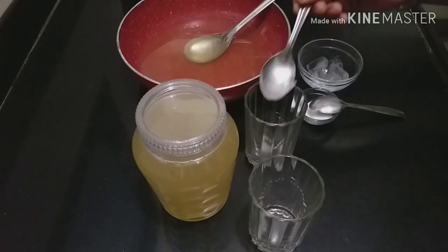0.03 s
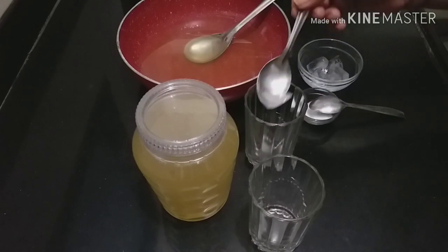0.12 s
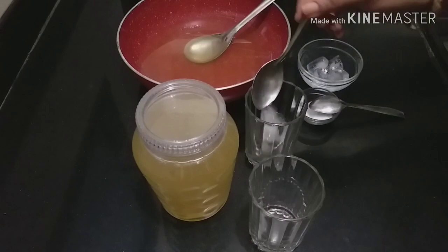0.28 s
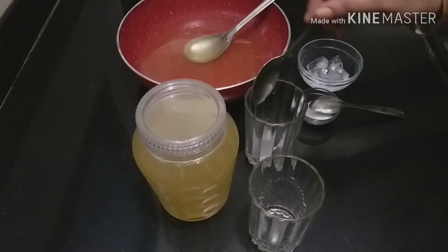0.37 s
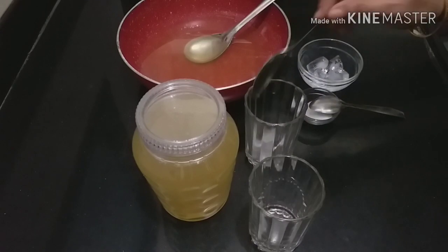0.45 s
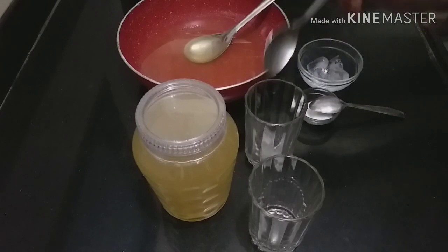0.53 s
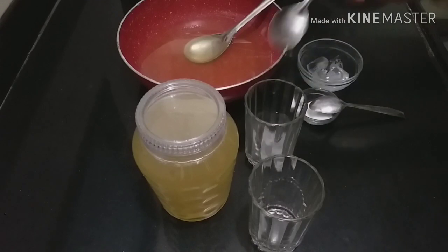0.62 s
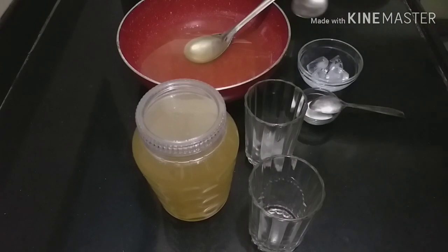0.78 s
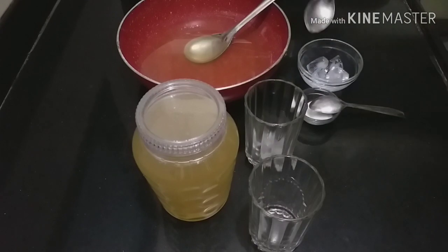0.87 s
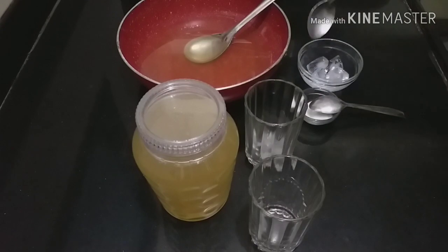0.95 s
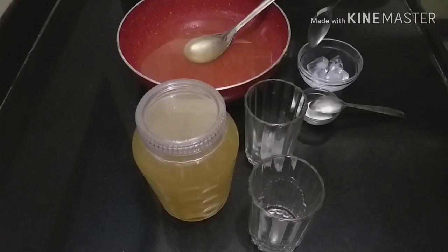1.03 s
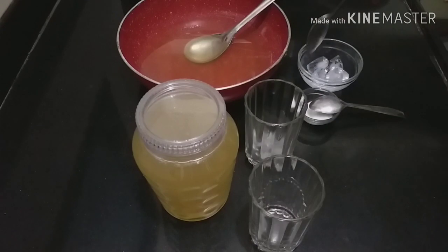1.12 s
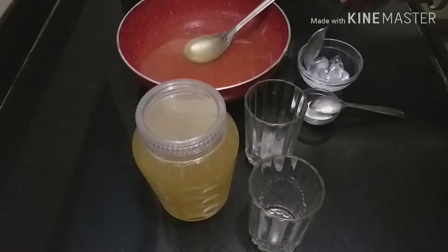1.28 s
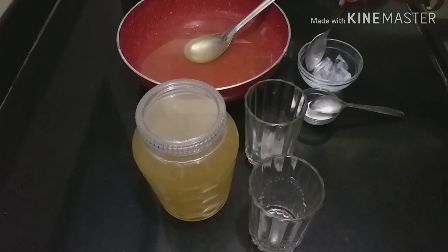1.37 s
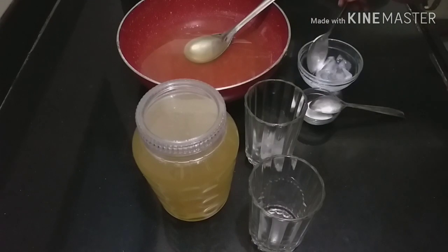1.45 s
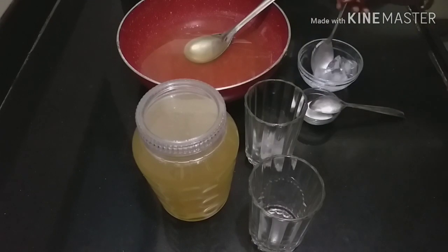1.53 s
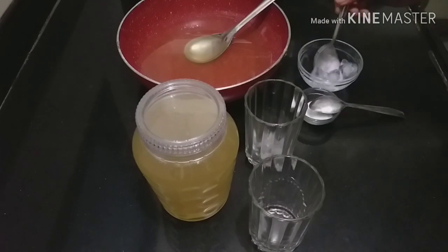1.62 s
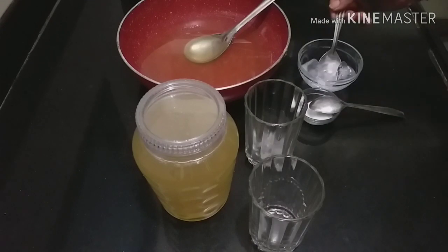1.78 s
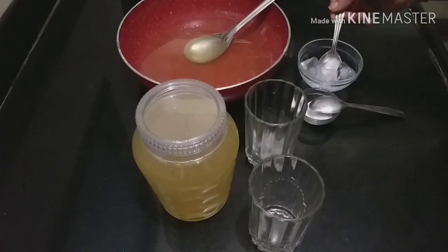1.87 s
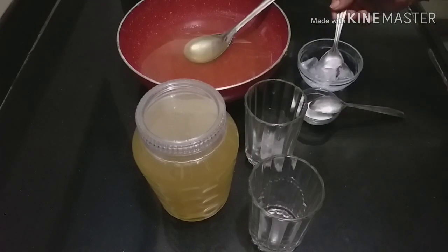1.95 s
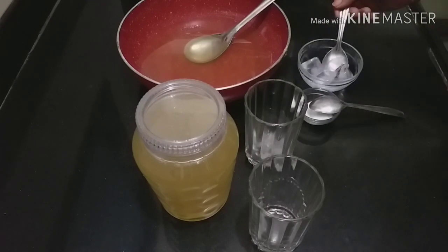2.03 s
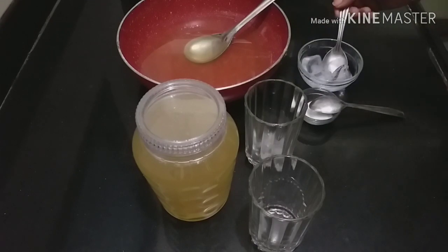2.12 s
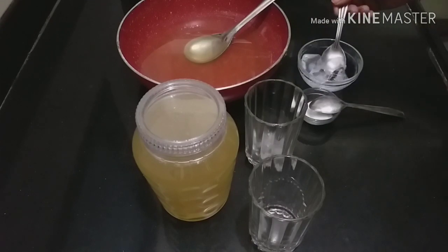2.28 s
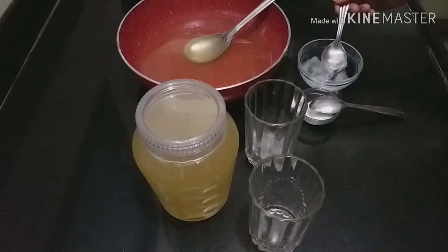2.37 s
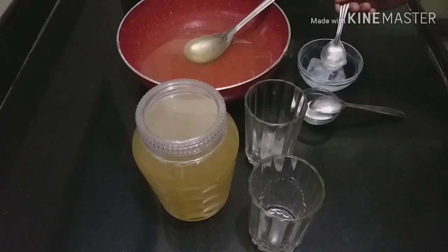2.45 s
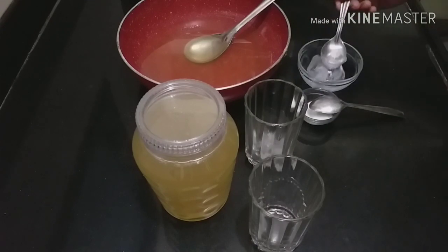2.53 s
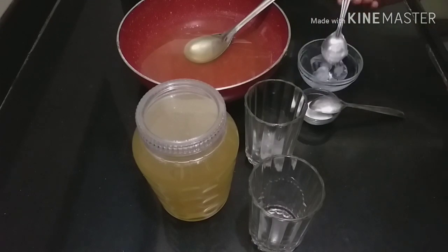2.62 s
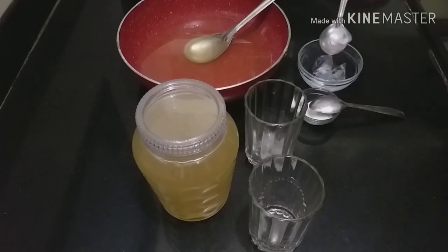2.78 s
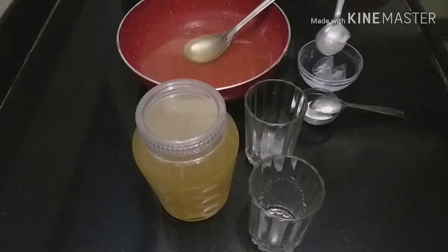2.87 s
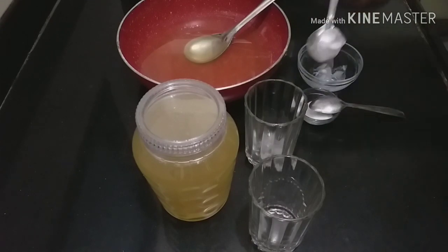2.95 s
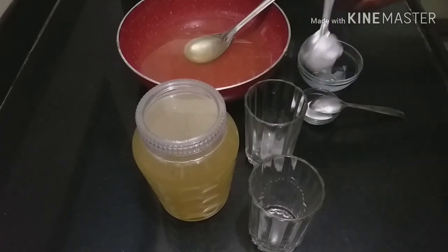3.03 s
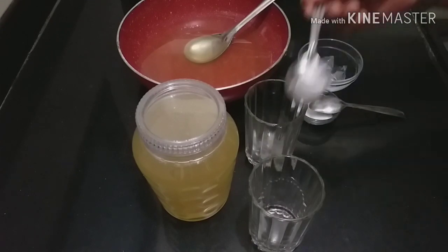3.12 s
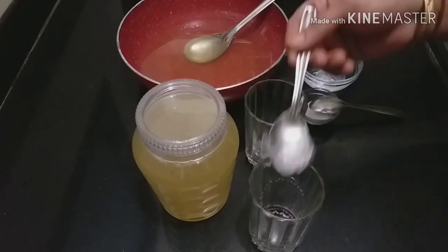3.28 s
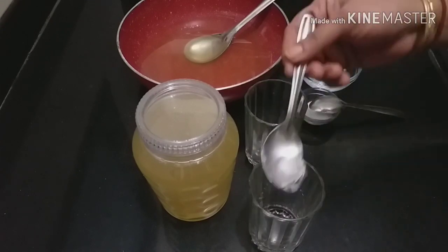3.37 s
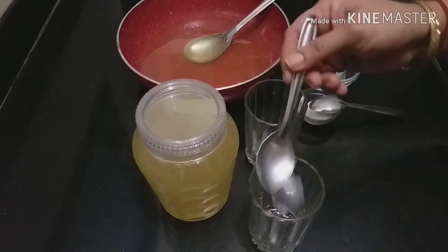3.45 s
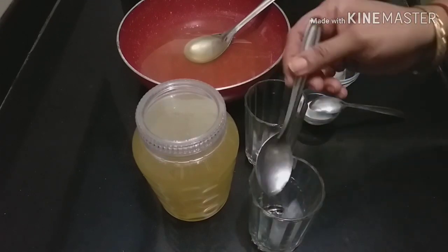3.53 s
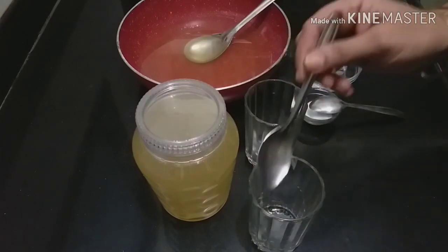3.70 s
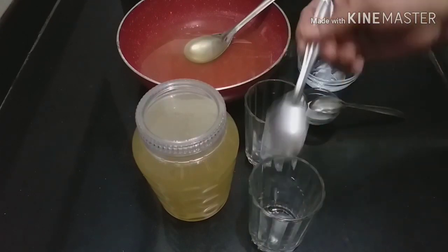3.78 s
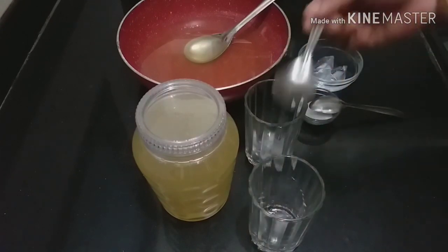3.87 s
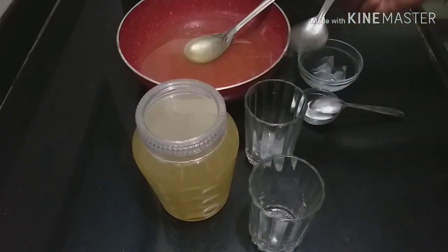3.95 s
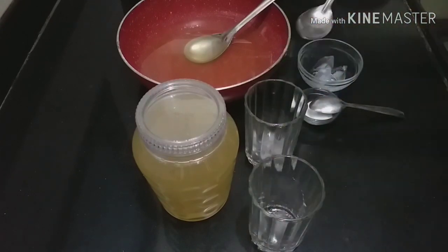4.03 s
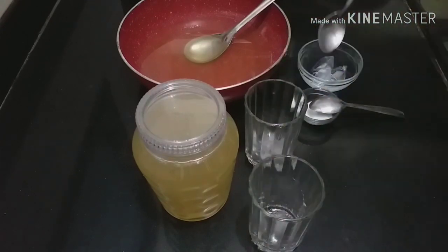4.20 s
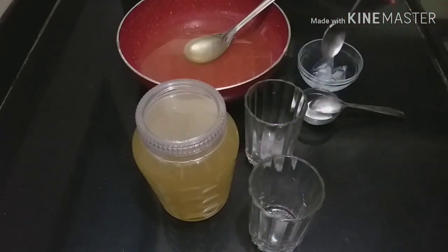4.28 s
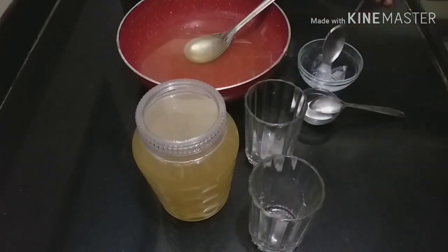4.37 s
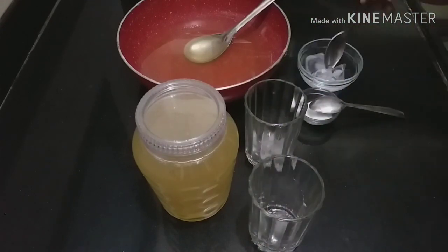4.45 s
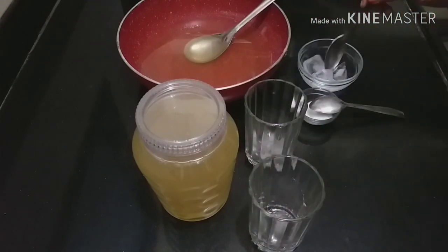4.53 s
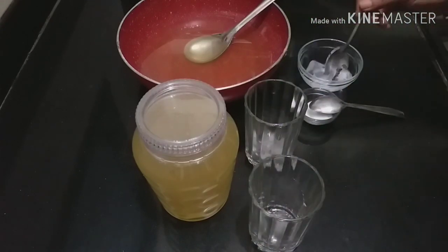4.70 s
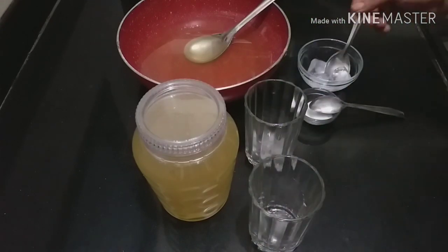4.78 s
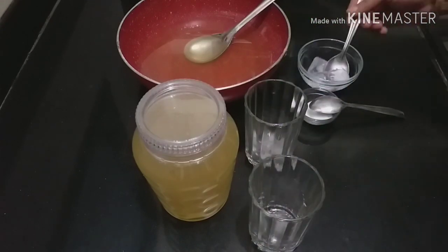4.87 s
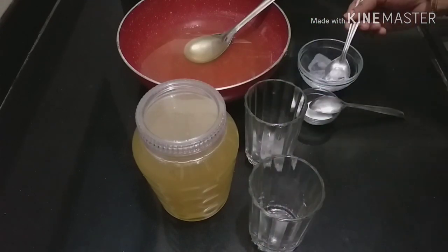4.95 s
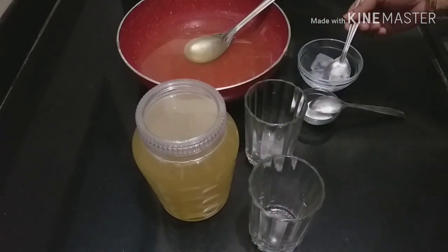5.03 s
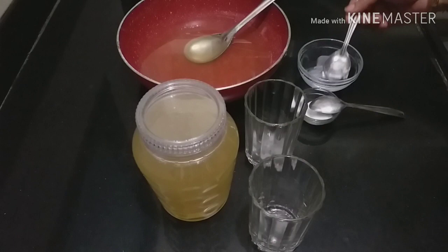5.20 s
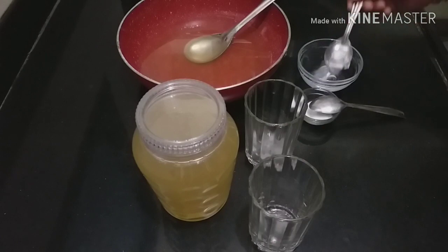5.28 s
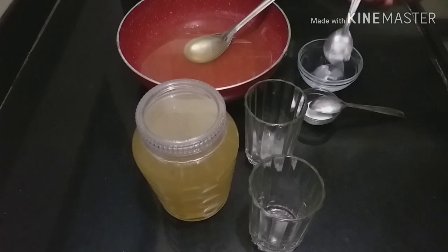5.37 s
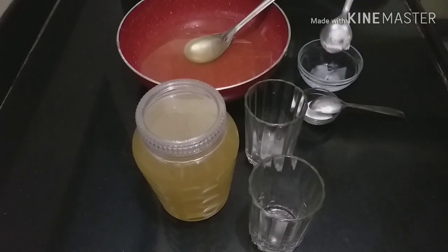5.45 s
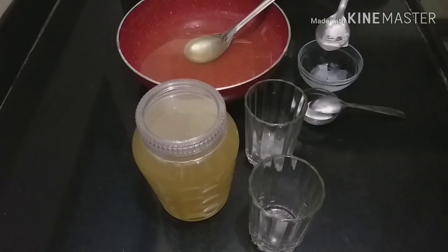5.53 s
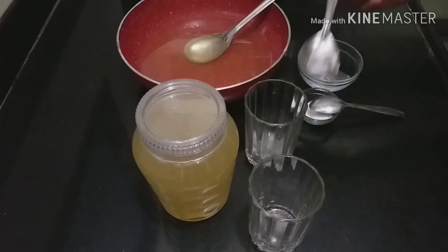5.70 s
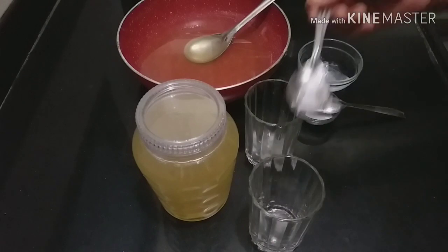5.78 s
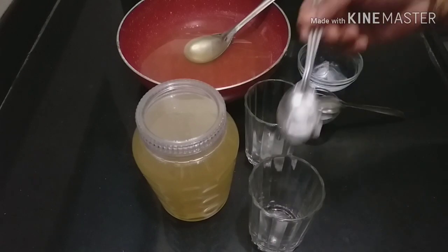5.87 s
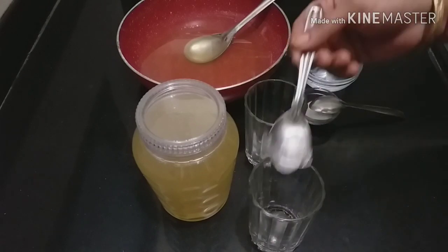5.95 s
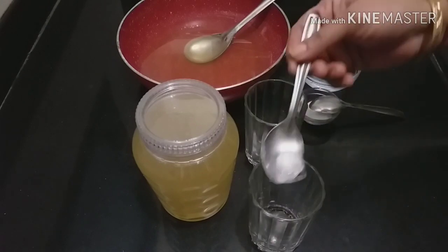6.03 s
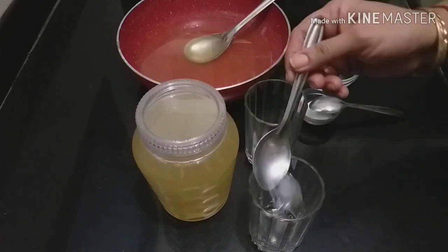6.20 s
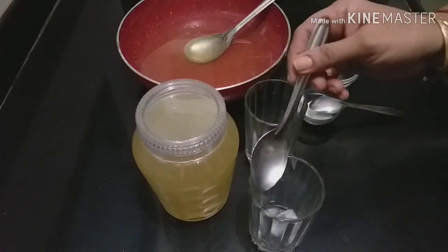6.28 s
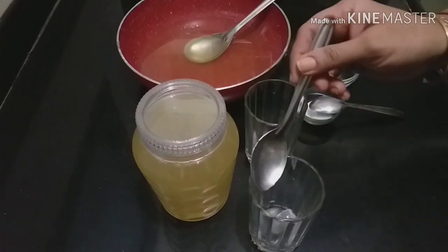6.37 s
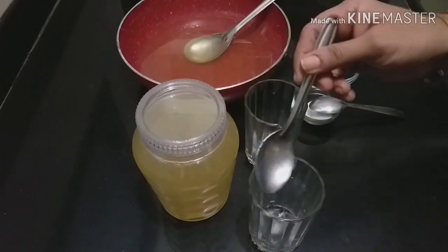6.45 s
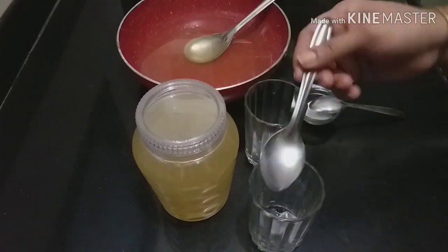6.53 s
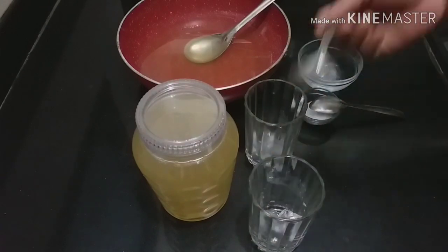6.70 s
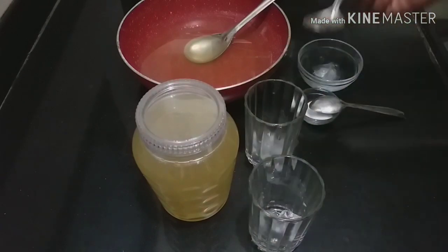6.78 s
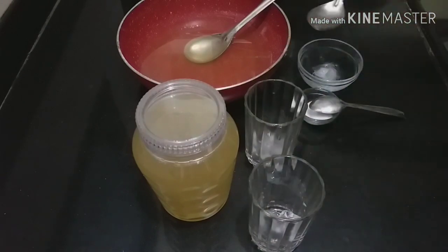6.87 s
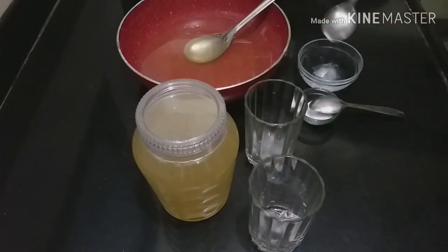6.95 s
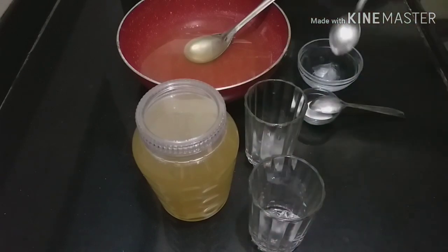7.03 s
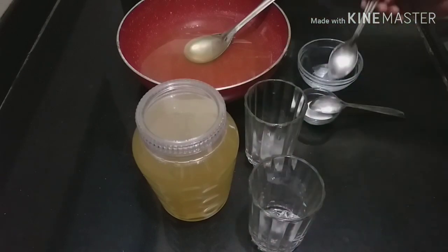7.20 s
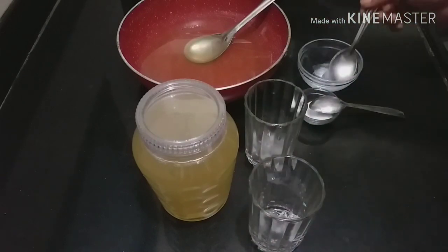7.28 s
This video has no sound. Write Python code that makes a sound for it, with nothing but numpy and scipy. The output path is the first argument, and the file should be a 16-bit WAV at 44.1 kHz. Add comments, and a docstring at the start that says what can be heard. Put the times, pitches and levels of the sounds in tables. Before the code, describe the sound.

Ice cubes drop and rattle into thick glass tumblers in three bursts, with a steel spoon clinking and scraping in a glass bowl between.

```python
"""In a small, hard-walled kitchen, a steel spoon scoops ice cubes from a small glass bowl into thick tumblers.
Three times a spoonful drops, bounces and rattles to rest; between the drops ice slides round the bowl.
Each contact is a pitched crack, a hollow knock and a bright snap; many also ring as fading sine tones.
Sliding and rattling are crowds of tiny random slips, and grinding is short bursts of rough noise.
The room answers every contact with fading noise echoes, over soft air noise and a faint appliance hum."""
import sys
import numpy as np
from scipy import signal
from scipy.io import wavfile

SR = 44100
rng = np.random.default_rng(int(sys.argv[2]) if len(sys.argv) > 2 else 0)


def generate_wav(signal):
    """Clip the signal to [-1, 1] and save it as 16-bit WAV at the path in sys.argv[1]."""
    frames = np.transpose(np.atleast_2d(signal))
    scaled = np.clip(frames, -1, 1) * 32767
    pcm = np.round(scaled).astype(np.int16)
    wavfile.write(sys.argv[1], SR, pcm)


N = 322812
TIME = np.arange(N) / SR
CUTOFF_HZ = 16500


def from_db(db):
    """Turn decibels into a plain multiplier."""
    return 10 ** (np.asarray(db) / 20)


def rms_one(x):
    """Scale a sound to an average (rms) strength of 1."""
    return x / np.sqrt(np.mean(x ** 2) + 1e-20)


def attack_one(x):
    """Scale a sound to rms 1 over its first 5 ms."""
    return x / np.sqrt(np.mean(x[:SR // 200] ** 2))


def fade(t, t60):
    """Die away steadily, by 60 dB in t60 seconds."""
    return np.exp(-np.log(1000) * t / t60)


def at_hz(points, hz, axis=1):
    """Read one column of a table between its rows, on a log-frequency axis."""
    points = np.array(points)
    return np.interp(np.log(hz), np.log(points[:, 0]), points[:, axis])


def butter(x, hz, kind, order=2):
    """Filter a sound: keep what is below, above or between the given pitches."""
    sos = signal.butter(order, np.clip(hz, 10, .45 * SR), kind, fs=SR, output="sos")
    return signal.sosfilt(sos, x)


def resonate(x, hz, width):
    """Ring at one pitch, as a resonance of gain 1 at its top; width is in Hz."""
    r = np.exp(-np.pi * width / SR)
    feed = np.array([1, 0, -1]) * (1 - r * r) / 2
    feedback = [1, -2 * r * np.cos(2 * np.pi * hz / SR), r * r]
    return signal.lfilter(feed, feedback, x + 1e-18)


def hollow_ring(x, hollow):
    """Pass a push through a vessel's hollow resonances, with alternating signs."""
    return sum((-1) ** k * from_db(db) * resonate(x, hz, width) for k, (hz, width, db) in enumerate(hollow))


def add(out, start_s, sound):
    """Mix a sound in at a given time."""
    i = round(start_s * SR)
    out[i:i + len(sound)] += sound[:max(N - i, 0)]


def noise_bands(size):
    """Give half-octave bands of noise with their centres; neighbours are unrelated."""
    white = rng.standard_normal((2, size))
    edges = 22 * 2 ** np.arange(0, 10, .5)
    for k, (low, high) in enumerate(zip(edges, edges[1:])):
        yield np.sqrt(low * high), butter(white[k % 2], [low, high], "band")


# Crack of an ordinary contact: knock and snap are reckoned from there
ORDINARY_DB, ORDINARY_HZ = -35, 3700
# The higher its crack, the more glancing a contact and the less it knocks on the vessel
KNOCK_LOSS_DB_PER_OCTAVE = 5.5


def blows(rows, knock_db, knock_growth, snap_db, snap_growth):
    """Give each contact a knock and snap that grow with its force, in dB per dB of crack."""
    out = []
    for start_s, crack_db, crack_hz, *_ in rows:
        force_db = crack_db - ORDINARY_DB
        glance_db = KNOCK_LOSS_DB_PER_OCTAVE * np.log2(crack_hz / ORDINARY_HZ)
        knock = knock_db + knock_growth * force_db - glance_db
        out.append((start_s, crack_db, crack_hz, knock, snap_db + snap_growth * force_db))
    return out


def contacts(rows, hollow, damping, chatter, chatter_t60, knock_chatter, snap_hz):
    """Turn a sharp push and a few ms of chatter into a pitched crack, a hollow knock and a bright snap."""
    out, t = np.zeros(N), TIME[:SR // 10]
    push = 1.0 * (t == 0)
    for start_s, crack_db, hz, knock_db, snap_db in rows:
        grit = rng.standard_normal((3, len(t))) * fade(t, chatter_t60)

        crack = resonate(push + chatter * grit[0], hz, damping * hz)
        crack = butter(butter(crack, 1600, "high"), 9000, "low", order=7)
        # Bending waves spread out in time, so the crack swells over a few cycles
        crack = crack - 2 * resonate(crack, hz, .5 * hz)

        knock = butter(hollow_ring(push + knock_chatter * grit[1], hollow), 2100, "low")

        snap = butter(push + 0.073 * grit[2], snap_hz, "high", order=4)
        snap = butter(snap, 20000, "low", order=1)
        for band_hz in np.geomspace(snap_hz, CUTOFF_HZ, 4):  # the snap is smeared likewise
            snap = snap - 2 * resonate(snap, band_hz, band_hz / 10)

        for level_db, part in [(crack_db, crack), (knock_db, knock), (snap_db, snap)]:
            add(out, start_s, from_db(level_db) * attack_one(part))
    return out


# A hard, glancing touch of steel favours the high tones: the ring's spectrum tilts about this pitch
RING_PIVOT_HZ = 4000


def struck_rings(rows, tones, split, twin_db, twin_life, rise_s):
    """Ring each tone by force and place; uneven walls and leaning ice split glass modes, so they waver."""
    out, t = np.zeros(N), TIME[:SR * 2 // 3]
    for start_s, _, _, ring_db, tilt_db, place_db in rows:
        for hz, tone_db, t60, sway in tones:
            db = ring_db + tone_db + tilt_db * np.log2(hz / RING_PIVOT_HZ) + sway * place_db
            # Three twins lie slightly off the tone's pitch; split is their typical relative offset
            detune, phase = rng.normal(0, split, (3, 1)), rng.random((3, 1))
            twins = np.sin(2 * np.pi * (hz * (1 + detune) * t + phase)).mean(axis=0)
            twins = twins * fade(t, t60 * twin_life)
            ring = np.sin(2 * np.pi * hz * t) * fade(t, t60) + from_db(twin_db) * twins
            add(out, start_s, from_db(db) * ring * (1 - np.exp(-t / rise_s)))
    return out


def strokes(rows, attack_s, sag_db, release_db_per_s):
    """Give the level in dB of movements that start quickly, sag as they go on and then die away."""
    levels = []
    for start_s, length_s, level_db, *_ in rows:
        since = TIME - start_s
        rise = 20 * np.log10(np.clip(since / attack_s, 1e-6, 1))
        sag = sag_db * np.clip(since / length_s, 0, 1)
        release = release_db_per_s * np.maximum(since - length_s, 0)
        levels.append(level_db + rise - sag - release)
    return np.max(levels, axis=0)


def jostle(level, hollow, per_s, spread_db, low_hz, high_hz, tick_width, tick_db, hollow_db):
    """Let wet ice slip at random: each slip stirs the vessel and ticks at one of ten pitches."""
    sizes = from_db(spread_db * np.minimum(rng.exponential(1, N), 3)) * rng.choice([-1, 1], N)
    slips = sizes * (rng.random(N) < per_s / SR)
    pitches = np.geomspace(low_hz, high_hz, 10)
    dealt = rng.integers(0, len(pitches), N)
    ticks = sum(resonate(slips * (dealt == k), hz, tick_width) for k, hz in enumerate(pitches))
    ticks = butter(ticks, high_hz, "low")
    force = from_db(0.22 * (level - level.max()))  # gentle slips hardly tick
    stir = butter(hollow_ring(slips, hollow), 2600, "low")
    mix = force * from_db(tick_db) * rms_one(ticks) + from_db(hollow_db) * rms_one(stir)
    return from_db(level) * mix


# Colour of the room air: pitch_hz, level_db (per Hz, relative)
AIR = [(15, -61), (25, -32), (48, -7.5), (145, -6.5), (175, -16), (285, -14), (405, -18.5), (560, -15),
       (1230, -31), (1480, -26.5), (4610, -34), (16000, -41)]
AIR_DB = -68  # rms level of the air
# Tones of the appliance hum: pitch_hz, level_db (rms)
HUM = [(60.5, -72.5), (96.9, -74.5), (145.3, -72.5), (279.9, -80.5)]


def background():
    """Room air is shaped noise; the appliance hum is sines with slightly wandering phases."""
    air = rms_one(sum(from_db(at_hz(AIR, hz)) * band for hz, band in noise_bands(N)))
    wander = np.cumsum(rng.standard_normal((len(HUM), N)), axis=1) / np.sqrt(SR)
    hum = 0
    for (hz, db), drift in zip(HUM, wander):
        hum = hum + np.sqrt(2) * from_db(db) * np.sin(2 * np.pi * hz * TIME + 3 * drift)
    return from_db(AIR_DB) * air + hum


# Tones heard when a tumbler is struck: glass modes, plus two faint ones near 3640 and 4020 Hz,
# perhaps the spoon or room: pitch_hz, level_db (relative), t60_s, sway (dB gained per dB of place)
TUMBLER_TONES = [(2859, -0.5, 0.39, 1), (3640, -16, 0.15, 0.5), (4020, -17, 0.14, 0),
                 (6790, -2.5, 0.1, -0.5), (9110, 1, 0.25, 1), (11660, -7, 0.2, -1)]
# Hollow resonances of a tumbler, its air and the counter under it: pitch_hz, width_hz, level_db (relative)
TUMBLER_HOLLOW = [(298, 51, -10.5), (560, 71, -7), (703, 29, -0.5), (912, 81, 4.5), (1078, 65, 5.5),
                  (1274, 140, 1), (1900, 760, -3.5)]
# Spoon on a tumbler: start_s, crack_db, crack_hz, ring_db, ring_tilt_db (per octave), place_db
# Place: a contact near the still points of some modes weakens them and favours the others
TUMBLER_CLINKS = [(.1232, -31, 4950, -34, 1, -3), (.2875, -48, 2870, -23.5, -13.5, -5.5),
                  (.3385, -26, 3890, -35.5, 7.5, 1), (.605, -32, 4900, -46, 0, 6.5),
                  (3.5112, -42.5, 2860, -32.5, -6.5, 4), (3.533, -43.5, 2885, -31.5, -5.5, 6),
                  (6.1474, -30, 5370, -35, 2.5, 1), (6.2229, -28.5, 3700, -29.5, -2, -1.5),
                  (6.2876, -20, 3770, -35.5, 8.5, .5), (6.338, -55, 2920, -36.5, -4.5, 5.5)]


def tumbler_clinks():
    """Steel taps thick glass: returns the knocks and the ring."""
    steel = blows(TUMBLER_CLINKS, knock_db=-43.5, knock_growth=.1, snap_db=-53.5, snap_growth=.8)
    hits = contacts(steel, TUMBLER_HOLLOW, damping=.4, chatter=0.082, chatter_t60=.025,
                    knock_chatter=0.082, snap_hz=7800)
    ring = struck_rings(TUMBLER_CLINKS, TUMBLER_TONES, split=0.0055, twin_db=-3, twin_life=1.25, rise_s=0.00021)
    return hits, ring


# Reverberation of the kitchen: pitch_hz, level_db (relative), t60_s
KITCHEN = [(200, -1, 0.2), (515, 6, 0.24), (1010, -2.5, 0.42), (2260, -2.5, 0.1), (4060, -9, 0.18),
           (7500, -8.5, 0.11), (10300, -7, 0.16), (16000, -13, 0.073)]


def kitchen(x, early_db, early_t60, first_s):
    """Hard walls, counter and crockery send back dense echoes; each band of the tail has its own fade."""
    t, echo = TIME[:SR], 0
    for hz, band in noise_bands(len(t)):
        tail = fade(t, at_hz(KITCHEN, hz, axis=2))
        early = from_db(early_db) * fade(t, early_t60)
        shape = (tail + early) * (1 - np.exp(-(t / first_s) ** 2))
        echo = echo + from_db(at_hz(KITCHEN, hz)) * band * shape / np.sqrt(np.sum(shape ** 2))
    return signal.fftconvolve(x, echo)[:N]


BUMP_S, BUMP_DB = .171, -28.5  # middle and peak level of the bump


def tumbler_bump():
    """A soft bump sets the air in the first tumbler sounding: a few ms of one hollow tone."""
    swell = np.exp(-((TIME - BUMP_S) / 0.003) ** 2)
    return from_db(BUMP_DB) * swell * np.sin(2 * np.pi * TUMBLER_HOLLOW[3][0] * TIME)


# A spoonful lands in a tumbler and rattles to rest:
# start_s, length_s, rattle_db (before ticks and stir are weighted), thump_db (extra, on the base)
DROPS = [(0.323, 0.22, -34, 1), (3.572, 0.27, -39.5, 1.5), (6.252, 0.23, -44, -2.5)]


def tumbler_rattle():
    """Cubes rattle to rest as many small slips against each other and the glass."""
    unrest_db = strokes(DROPS, attack_s=0.012, sag_db=9.5, release_db_per_s=296.5)
    return jostle(unrest_db, TUMBLER_HOLLOW, per_s=620, spread_db=3.0, low_hz=2300, high_hz=7200,
                  tick_width=230, tick_db=-2.5, hollow_db=-11)


# The first landings thump the tumbler's base; later bounces hardly do
THUMP_FADE_DB_PER_S = 74


def settling(rows):
    """A spoonful thumps the base as it lands; the later a contact, the less it knocks."""
    out = []
    for start_s, crack_db, crack_hz, knock_db, snap_db in rows:
        landed_s, _, _, thump_db = min(DROPS, key=lambda drop: abs(start_s - drop[0]))
        knock = knock_db + thump_db - THUMP_FADE_DB_PER_S * (start_s - landed_s)
        out.append((start_s, crack_db, crack_hz, knock, snap_db))
    return out


# Contacts as a spoonful lands and bounces in a tumbler, mostly cubes, one (at 0.3331 s) probably the spoon:
# start_s, crack_db, crack_hz
TUMBLER_LANDINGS = [(.324, -26, 2480), (0.3331, -34.5, 3800), (0.3598, -28, 4650), (0.3663, -21, 3520),
                    (0.3777, -35, 3130), (0.429, -32, 3760), (.4615, -32, 4620), (0.4676, -31, 4340),
                    (0.51, -37, 4700), (0.6484, -46.5, 3770), (3.5536, -27, 3200), (3.56, -22.5, 3670),
                    (3.5635, -25.5, 2580), (3.576, -30, 4300), (3.6665, -29.5, 3000), (3.6924, -29.5, 3800),
                    (3.7059, -27, 3420), (3.7432, -23.5, 4060), (3.761, -23.5, 7520), (6.2762, -16.5, 2660),
                    (6.293, -31, 3550), (6.4185, -41, 3300), (6.4565, -36, 3050)]
LANDING_RING_DB = -9.5  # ring against crack, for a crack at the lowest mode's pitch


def tumbler_landings():
    """A spoonful, mostly cubes, lands and bounces in a tumbler: returns the knocks and the ring."""
    landings = blows(TUMBLER_LANDINGS, knock_db=-34.5, knock_growth=0.28, snap_db=-53, snap_growth=1.4)
    hits = contacts(settling(landings), TUMBLER_HOLLOW, damping=.4, chatter=0.082, chatter_t60=.025,
                    knock_chatter=0.082, snap_hz=7800)
    # Ice is softer than steel: it wakes only the lowest mode, and less the further its crack lies from it
    ringing = []
    for start_s, crack_db, hz in TUMBLER_LANDINGS:
        octaves_off = abs(np.log2(hz / TUMBLER_TONES[0][0]))
        ringing.append((start_s, crack_db, hz, crack_db + LANDING_RING_DB - 12 * octaves_off, 0, 0))
    ring = struck_rings(ringing, TUMBLER_TONES[:1], split=.008, twin_db=-4, twin_life=1.3, rise_s=0.0004)
    return hits, ring


# Tones heard when the bowl is struck: glass modes, and one at 12690 Hz that may be the spoon's:
# pitch_hz, level_db (relative), t60_s, sway (dB gained per dB of place)
BOWL_TONES = [(1829, -2, 0.061, 1), (4170, 0.5, .3, -1), (7124, 10, .1, .4), (10590, 0.5, .06, -1),
              (12690, -12, .2, 2.1), (14665, -9.5, .1, -0.71)]
# Hollow resonances of the bowl, its air and the counter under it: pitch_hz, width_hz, level_db (relative)
BOWL_HOLLOW = [(845, 500, -16.5), (1510, 98, 3), (1770, 210, 1.5), (1932, 140, 3.5)]
# Spoon on the bowl: start_s, crack_db, crack_hz, ring_db, ring_tilt_db (per octave), place_db
BOWL_CLINKS = [(1.0867, -21.5, 7230, -37.5, 9, -3), (1.3178, -42, 6970, -41, -5.5, -2.5),
               (1.8263, -34.5, 4050, -45, -5.5, 2.5), (1.9194, -34.5, 4060, -46, -2.5, 5.5),
               (2.27, -45, 4440, -53.5, -6, 1.5), (4.305, -36.5, 3170, -57.5, 1, 1),
               (4.5976, -28.5, 3600, -51, -8.5, 14.5), (4.9541, -33.5, 4110, -48, -2.5, 2),
               (5.134, -36.5, 4310, -46, -8, -0.5), (7.3054, -27, 2740, -33.5, -3.5, 6.5)]


def bowl_clinks():
    """The spoon strikes the bowl as it digs: returns the knocks and the ring."""
    steel = blows(BOWL_CLINKS, knock_db=-44.5, knock_growth=1.2, snap_db=-47.5, snap_growth=1.6)
    hits = contacts(steel, BOWL_HOLLOW, damping=0.12, chatter=0.1, chatter_t60=0.02,
                    knock_chatter=0.2, snap_hz=8540)
    ring = struck_rings(BOWL_CLINKS, BOWL_TONES, split=0.014, twin_db=-3.5, twin_life=1.0, rise_s=.0006)
    return hits, ring


# The spoon pushes cubes round the bowl: start_s, length_s, push_db (before ticks and stir are weighted)
PUSHES = [(1.15, 0.25, -50), (1.48, 0.25, -44.5), (1.83, 0.32, -46.5), (2.25, 0.35, -53),
          (2.73, 0.091, -62), (4.32, 0.21, -59.5), (4.52, 0.42, -55), (4.91, .38, -50), (7.21, 0.052, -65)]


def bowl_slide():
    """Ice slides round the bowl in small slips, which keep two glass modes faintly singing."""
    push_db = strokes(PUSHES, attack_s=.008, sag_db=8, release_db_per_s=71)
    slide = jostle(push_db, BOWL_HOLLOW, per_s=800, spread_db=6.0, low_hz=2689, high_hz=4863,
                   tick_width=370, tick_db=-5.5, hollow_db=-4.5)
    second_mode = from_db(10.5) * resonate(slide, BOWL_TONES[1][0], 130)
    third_mode = from_db(26.5) * resonate(slide, BOWL_TONES[2][0], 80)
    return slide + second_mode + third_mode


# Small knocks in the bowl: mostly cubes, a few (such as 1.2592 and 4.6648 s) probably the spoon:
# start_s, crack_db, crack_hz
BOWL_KNOCKS = [(1.2592, -46, 2700), (1.4785, -36, 3020), (1.491, -42, 2830), (1.5332, -42.5, 2900),
               (1.5766, -36, 3800), (1.59, -38, 3550), (1.6029, -34.5, 4050), (1.6193, -23, 4250),
               (1.7463, -43, 4130), (1.8559, -40, 2510), (2.038, -34.5, 4310), (2.1081, -45.5, 1860),
               (2.3546, -37.5, 4300), (2.6175, -42.5, 4676), (4.6648, -41.5, 3800), (4.7416, -48, 3260),
               (4.9149, -26, 4060), (4.9358, -30, 3530), (4.9891, -36, 4300), (5.0054, -39, 4540),
               (5.0269, -37.5, 4700), (5.2193, -38.5, 4470)]


def bowl_knocks():
    """Small knocks in the bowl, mostly cubes on the glass and on each other."""
    knocks = blows(BOWL_KNOCKS, knock_db=-46, knock_growth=0.76, snap_db=-58.5, snap_growth=1.1)
    return contacts(knocks, BOWL_HOLLOW, damping=0.086, chatter=0.17, chatter_t60=0.019,
                    knock_chatter=0.094, snap_hz=7630)


# The spoon forcing its way under a cube grinds briefly: start_s, level_db (before the fade), t60_s
GRINDS = [(2.518, -46, 0.11), (4.52, -54.5, 0.11), (4.83, -58.5, .17), (4.913, -33.5, 0.18),
          (5.08, -43, 0.044)]


def grinding():
    """Steel dragged over ice: a dying burst of rough noise in the cube's own resonance."""
    out, t = np.zeros(N), TIME[:SR // 2]
    for start_s, level_db, t60 in GRINDS:
        rough = rng.standard_normal(len(t)) ** 3  # cubing makes it spiky
        scrape = rms_one(butter(rough, [3800, 5100], "band", order=3))
        add(out, start_s, from_db(level_db) * scrape * fade(t, t60))
    return out


# A faint tap somewhere else in the room: start_s, level_db (before filter and fade)
FAR_TAP = (6.94, -47)


def far_tap():
    """A far tap is a short soft scuff of fading noise."""
    out, t = np.zeros(N), TIME[:SR // 10]
    start_s, level_db = FAR_TAP
    scuff = butter(rng.standard_normal(len(t)), 7200, "low", order=1)
    add(out, start_s, from_db(level_db) * scuff * fade(t, 0.065))
    return out


def scene():
    """Mix knocks and rings, direct and by way of the room; the far tap comes only by way of the room."""
    clink_hits, clink_ring = tumbler_clinks()
    landing_hits, landing_ring = tumbler_landings()
    bowl_hits, bowl_ring = bowl_clinks()
    drops = clink_hits + tumbler_bump() + tumbler_rattle() + landing_hits
    tumbler_ring = clink_ring + landing_ring
    digging = bowl_hits + bowl_slide() + bowl_knocks() + grinding()

    direct = drops + digging + tumbler_ring + bowl_ring
    to_room = drops + from_db(2.5) * digging + from_db(1.5) * tumbler_ring + from_db(3.0) * bowl_ring
    to_room = to_room + far_tap()
    room = kitchen(to_room, early_db=0.0, early_t60=0.36, first_s=0.0009)
    mid = direct + room + background()
    # Nearly mono: the middle range leans left, and the left side arrives a hair early
    side = .2 * resonate(mid, 2000, 600) + 0.056 * np.gradient(mid)
    return np.array([mid + side, mid - side])


def record(dry):
    """Cut the deep bass, round the loudest peaks, then cut the top."""
    rounded = np.tanh(butter(dry, 45, "high"))
    return signal.sosfilt(signal.cheby2(14, 60, CUTOFF_HZ, fs=SR, output="sos"), rounded)


dry = scene()
out = record(dry)
generate_wav(out)
```